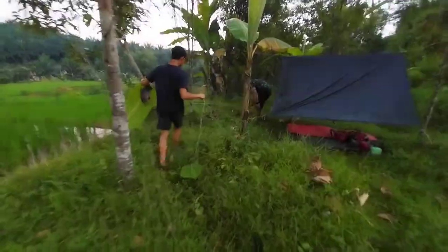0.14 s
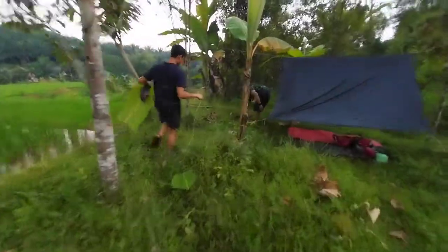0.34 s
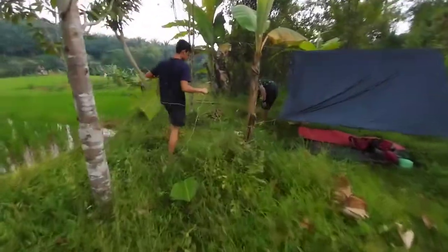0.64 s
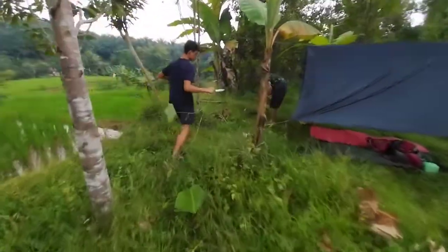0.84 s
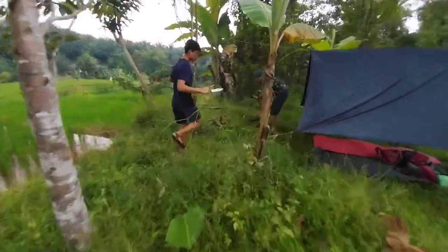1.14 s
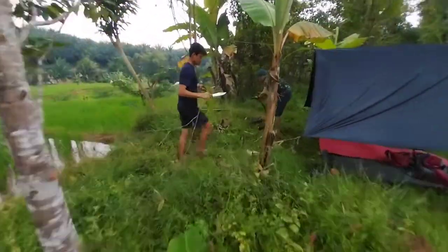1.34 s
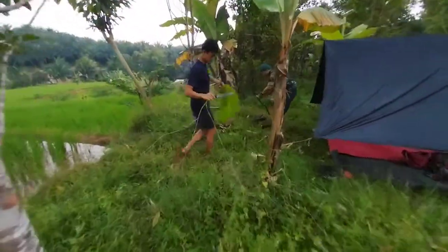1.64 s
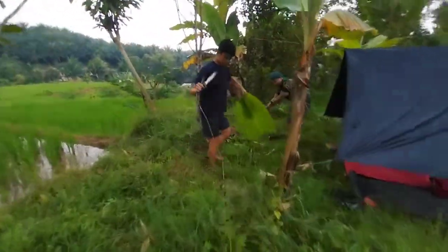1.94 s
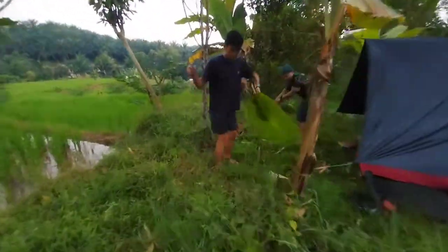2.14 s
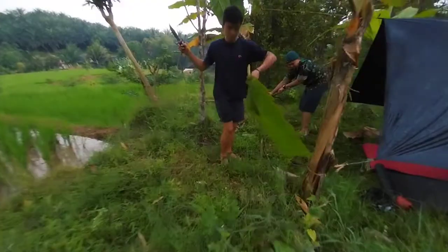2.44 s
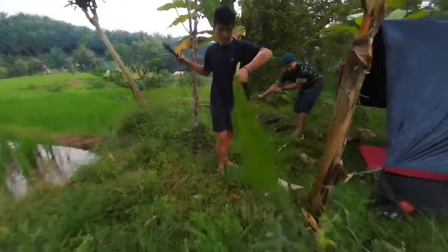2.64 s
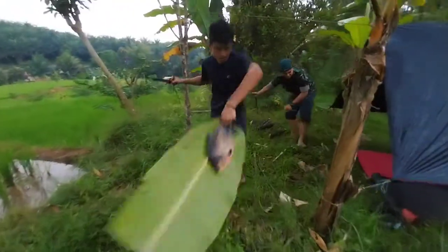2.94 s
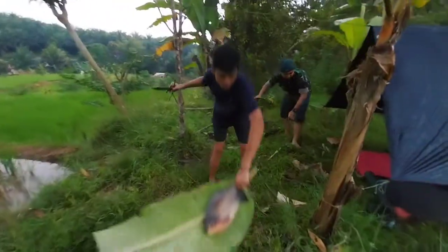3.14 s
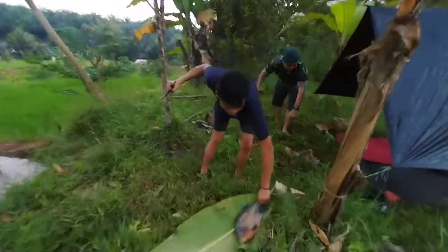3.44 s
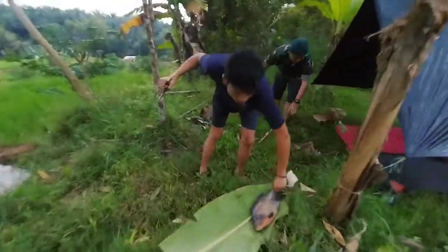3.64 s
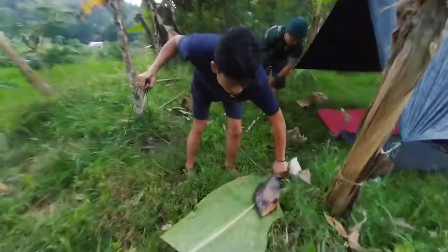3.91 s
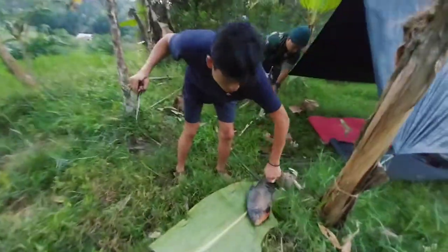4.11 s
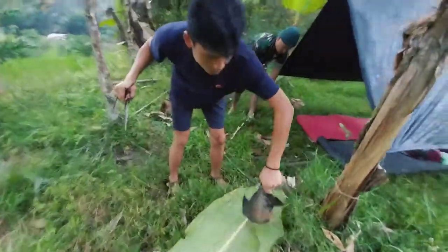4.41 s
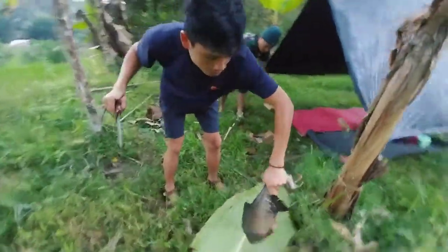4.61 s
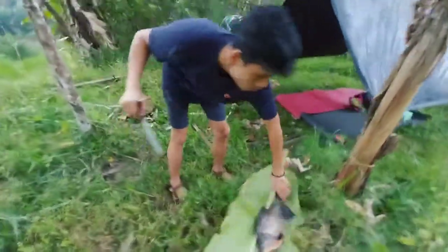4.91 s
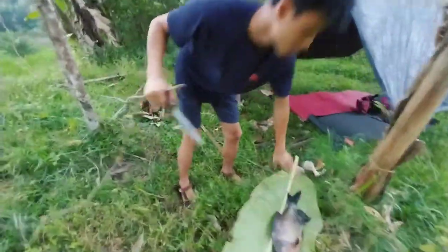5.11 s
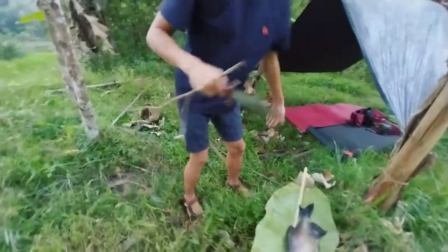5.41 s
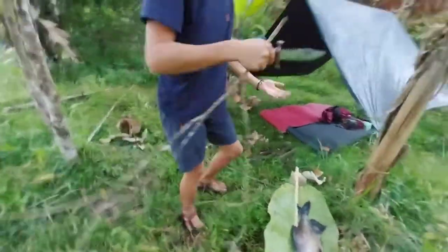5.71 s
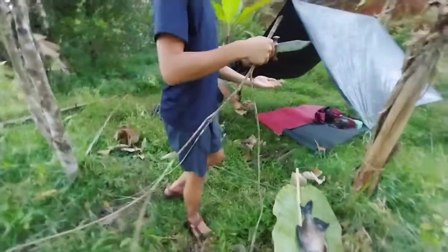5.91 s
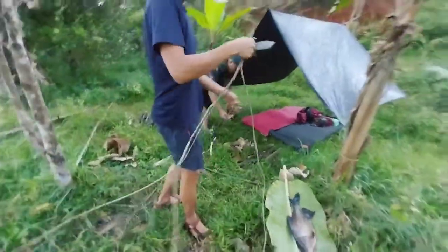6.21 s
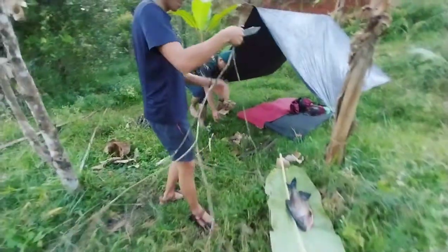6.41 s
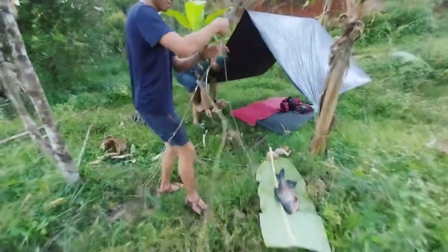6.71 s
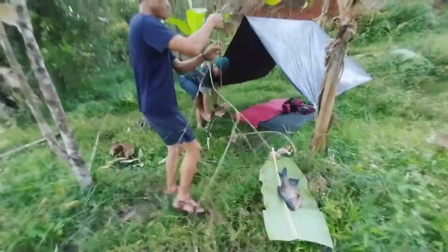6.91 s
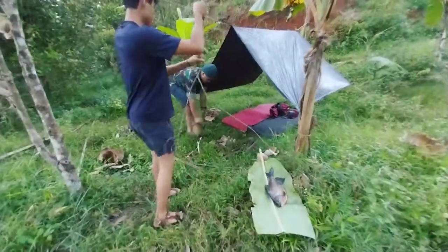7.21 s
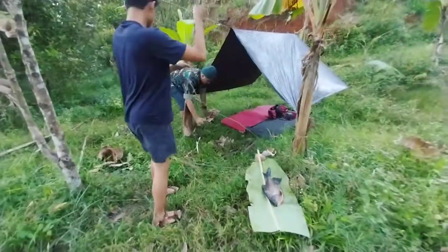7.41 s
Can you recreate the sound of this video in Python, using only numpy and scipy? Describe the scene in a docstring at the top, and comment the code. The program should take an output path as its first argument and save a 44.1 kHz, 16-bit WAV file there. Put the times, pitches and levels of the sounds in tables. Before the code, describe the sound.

From the start, footsteps swish and crunch through long grass outdoors, close by and in stereo. Beneath them lie a low rumble, a faint wavering hum, occasional soft booms and faint far insects. Small twigs crack near 0.4 seconds and dull knocks come at about 1 second. Dry sticks snap sharply at 2.1 and 2.7 seconds, the second the loudest, with a faint distant bird call between them. At about 3.4 seconds a big leaf is laid on the ground with a dull knock and slides over the grass with a hollow, grainy scrape for half a second. After a brief lull, a stick cracks at 4.8 seconds and the leaf moves again with a few soft knocks. The steps go on, with a snap near 5.8 seconds and another far bird call at 6.5. Around 7.3 seconds more sticks snap and tear.

```python
"""Walking through long grass at a field camp, heard by two closely spaced microphones.
From the start, blades swish past the legs over a low rumble, a faint hum, soft booms and far insects.
Between 2 and 3 seconds a far bird calls and dry sticks snap, the loudest sounds of the walk.
Then a big leaf is laid on the ground with a dull knock and slid over the grass; near 5 seconds it moves
again. The steps go on, a bird calls once more, and more sticks snap and tear at the end."""
import sys
import numpy as np
from scipy import signal
from scipy.fft import rfft, irfft
from scipy.io import wavfile

SR = 44100
rng = np.random.default_rng(int(sys.argv[2]) if len(sys.argv) > 2 else 0)


def int16_out(signal):
    """Quantize to a 16-bit WAV file."""
    q = np.round(np.clip(np.atleast_2d(signal).T, -1, 1) * 32767)
    wavfile.write(sys.argv[1], SR, q.astype(np.int16))


N = 333032
TIME = np.arange(N) / SR
# the tone of cracks scattered among the plants: (frequency [Hz], level [dB])
SCATTER_TONE = [(400, -2), (2400, -0.5), (5000, 0), (7500, -1.5), (9000, -7), (12000, 1)]


def from_db(db):
    """Turn decibels into a number to multiply a sound by."""
    return 10 ** (np.asarray(db) / 20)


def rms_one(x):
    """Scale a sound so that its average power is 1."""
    return x / np.sqrt(np.mean(x ** 2) + 1e-20)


def butter(x, hz, kind, order=2):
    """Keep the "low" or the "high" side of hz; a higher order cuts more steeply."""
    return signal.sosfilt(signal.butter(order, np.clip(hz, 10, .49 * SR), kind, fs=SR, output="sos"), x)


def resonate(x, hz, width_hz):
    """Let a sound ring at one pitch; a narrower width rings longer."""
    r = np.exp(-np.pi * width_hz / SR)
    feedback = [1, -2 * r * np.cos(2 * np.pi * hz / SR), r * r]
    return signal.lfilter(np.array([1, 0, -1]) * (1 - r * r) / 2, feedback, x)


def colour(x, tone):
    """Give a stereo sound the tone in a table of (frequency [Hz], level [dB])."""
    size = 4096
    hz, db = np.transpose(tone)
    shape_db = np.interp(np.log(np.arange(size // 2 + 1) * SR / size + 1), np.log(hz), db)
    # fold the filter's early half onto its late half, so nothing sounds early
    cepstrum = irfft(np.log(from_db(shape_db)))
    cepstrum[1:size // 2] *= 2
    cepstrum[size // 2 + 1:] = 0
    response = irfft(np.exp(rfft(cepstrum)))
    return signal.fftconvolve(x, response[None], axes=1)[:, :x.shape[1]]


def wander(size, hz):
    """A smooth random curve of typical size 1; a higher hz makes it move faster."""
    return rms_one(butter(rng.standard_normal(size + SR), hz, "low")[SR:])


def bump(s, half_s):
    """A smooth rise and fall around time s."""
    return np.exp(-((TIME - s) / half_s) ** 2)


def swell(s, hold_s, rise_db_per_s, fall_db_per_s, sag_db_per_s=0):
    """A strength that rises to 1 at time s, holds or sags for a while and dies away."""
    t = TIME - s
    rise = rise_db_per_s * np.minimum(t, 0)
    sag = sag_db_per_s * np.clip(t, 0, hold_s)
    fall = fall_db_per_s * np.maximum(t - hold_s, 0)
    return from_db(np.maximum(rise - sag - fall, -120))


def from_side(x, side, lag_s=0.00027):
    """A sound from one side (-1 right, 1 left) reaches the nearer microphone first."""
    lag = int(round(np.clip(side, -1.5, 1.5) * lag_s * SR))
    return np.array([np.pad(x, (max(delay, 0), 0))[:len(x)] for delay in (-lag, lag)])


def grains(size, per_s, spread_db):
    """Tiny random clicks of uneven strength."""
    strength = from_db(spread_db * np.minimum(rng.exponential(1, size), 4)) * rng.standard_normal(size)
    return strength * (rng.random(size) < per_s / SR)


def all_around(size, per_s, spread_db, count=13, width=1):
    """Tiny clicks from many directions: alike in both microphones only in the bass."""
    sides = width * (np.linspace(-1, 1, count) + rng.uniform(-1, 1, count) / count)
    return sum(from_side(grains(size, per_s / count, spread_db), side) for side in sides)


def add(out, s, sound):
    """Mix a stereo sound in at time s."""
    at = int(s * SR)
    out[:, at:at + sound.shape[1]] += sound[:, :N - at]


def rumble(buffet_hz=60, lumps_db=1.5, calming_db_per_s=1.5):
    """Low outdoor rumble; air pushes on each microphone separately and slowly calms."""
    # the rumble's tone: (frequency [Hz], level [dB])
    tone = [(25, -23.5), (60, -7), (100, -0.5), (140, -6), (210, -5.5), (290, -15.5), (900, -41)]
    # its rise and fall: (time [s], level [dB])
    levels = [(0, -48), (1.1, -47), (1.5, -54), (1.9, -45), (3.1, -51.5), (3.9, -45), (7.55, -47.5)]
    shared = rms_one(colour(all_around(N, per_s=20000, spread_db=1.5, count=5), tone))
    buffet = rms_one(butter(colour(rng.standard_normal((2, N)), tone), buffet_hz, "low"))
    s, db = np.transpose(levels)
    level = from_db(np.interp(TIME, s, db, right=-120) + lumps_db * wander(N, 11.6))
    return level * (shared + from_db(-calming_db_per_s * TIME) * buffet)


def hum(level_db=-6.5, wobble_hz=2.83, flicker_db=-1.0):
    """A faint low tone that wavers in pitch and strength."""
    # the hum's drift: (time [s], pitch [Hz], level before level_db is added [dB])
    drift = [(0, 208, -53.5), (3, 209.7, -59), (4.551, 192.8, -45.5), (5.3, 181.1, -42.5),
             (5.65, 206.7, -48.5), (7.55, 168, -46.5)]
    s, hz, db = np.transpose(drift)
    pitch = np.interp(TIME, s, hz) + wobble_hz * wander(N, 12.73)
    level = from_db(np.interp(TIME, s, db) + level_db + flicker_db * wander(N, 9.2))
    return level * rms_one(np.sin(2 * np.pi * np.cumsum(pitch) / SR))


def insects(chirp_s=0.045, top_hz=5060, fall_hz=750, blur_hz=200, whine_hz=6930, whine_db=-65):
    """Far insects: trills of quick falling chirps, blurred by distance, and a thin pulsing whine."""
    # each trill: (time [s], level [dB])
    trills = [(1.37, -66), (4.27, -63), (4.72, -65), (5.231, -56.5)]
    # each spell of whining: (time [s], half length [s])
    whines = [(.53, 0.15), (1.333, 0.11), (2.95, 0.9)]
    in_chirp = TIME / chirp_s % 1  # runs from 0 to 1 in every chirp
    pitch = top_hz - fall_hz * in_chirp + blur_hz * np.array([wander(N, 377) for _ in range(2)])
    chirps = rms_one(np.sin(np.pi * in_chirp) * np.sin(2 * np.pi * np.cumsum(pitch, axis=1) / SR))
    pulses = np.sin(np.pi * 16 * TIME) ** 2  # 16 a second
    whine = rms_one(resonate(rng.standard_normal((2, N)), whine_hz, width_hz=130) * pulses)
    trill_level = sum(from_db(db) * bump(s, half_s=0.095) for s, db in trills)
    whine_level = from_db(whine_db) * sum(bump(s, half_s) for s, half_s in whines)
    return trill_level * chirps + whine_level * whine


def birds(rise_hz_per_s=4200, blur_hz=190):
    """Short rising calls from across the field, smeared by distance."""
    # each call: (time [s], level [dB], pitch [Hz], half length [s])
    calls = [(2.343, -60.5, 3270, .06), (6.484, -57, 1734, .055)]
    out = 0
    for s, db, hz, half_s in calls:
        glide = rise_hz_per_s * np.clip(TIME - s, -2 * half_s, 2 * half_s)
        pitch = hz + glide + blur_hz * wander(N, 2 * blur_hz)
        out += from_db(db) * bump(s, half_s) * np.sqrt(2) * np.sin(2 * np.pi * np.cumsum(pitch) / SR)
    return out


def booms(waver=0.34, sag_hz_per_s=70):
    """Short, soft swells in the bass whose pitch wavers and sinks a little."""
    # each boom: (time [s], level [dB], pitch [Hz], half length [s])
    swells = [(0.761, -36.5, 106, 0.018), (1.062, -34, 95, 0.012), (2.504, -40.5, 97, 0.034),
              (3.358, -23, 188, 0.0074), (4.528, -37.5, 101, 0.056), (5.247, -33, 103.5, 0.035),
              (5.724, -38, 106.3, 0.033), (5.99, -38.5, 137.4, 0.035), (6.499, -40, 136.5, 0.037)]
    out = np.zeros(N)
    for s, db, hz, half_s in swells:
        near = np.abs(TIME - s) < 4 * half_s
        t = TIME[near] - s
        phase = 2 * np.pi * (hz * t - sag_hz_per_s * t ** 2 / 2 + rng.random())
        phase += waver * wander(len(t), 51)
        out[near] += from_db(db) * np.sqrt(2) * np.sin(phase) * np.exp(-(t / half_s) ** 2 / 2)
    return out


def wading(press, slide):
    """How strongly the grass swishes and crunches as the legs and the leaf push through it."""
    # each sweep of a leg: (time at full speed [s], length [s], blade swish [dB], stalk crunch [dB])
    strides = [(.03, 0.054, -44.5, -57), (.2, 0.11, -45.5, -52.5), (.345, 0.013, -61, -51),
               (.73, 0.1, -47.5, -56), (0.979, 0.053, -37, -45.5), (1.53, 0.01, -48.5, -59.5),
               (1.676, 0.16, -44.5, -50.5), (2.0, 0.19, -52.5, -62.5), (2.45, 0.092, -41.5, -49),
               (3.15, 0.081, -50, -63), (3.93, 0.1, -50.5, -48.5), (4.44, 0.16, -42.5, -49),
               (5.28, 0.019, -82, -49.5), (5.462, 0.16, -37.5, -56), (5.74, 0.11, -40.5, -50),
               (6.01, 0.095, -47, -53.5), (6.199, 0.053, -39, -44.5), (6.47, 0.012, -75, -50),
               (6.89, 0.17, -52.5, -54)]
    # powers add up, starting with a faint steady stir and the grass under the leaf
    swish = from_db(-56) ** 2 + (from_db(-4) * slide) ** 2 + (from_db(-10) * press) ** 2
    crunch = from_db(-65.5) ** 2 + (from_db(-1.5) * slide) ** 2
    for s, length_s, swish_db, crunch_db in strides:
        # the leg speeds up, then the grass springs back
        sweep = swell(s, length_s, rise_db_per_s=169, fall_db_per_s=128)
        swish += (from_db(swish_db) * sweep) ** 2
        crunch += (from_db(crunch_db) * sweep) ** 2
    hush = from_db(-9 * bump(s=4.73, half_s=0.11))  # for a moment nobody moves
    return hush * np.sqrt(swish), hush * np.sqrt(crunch)


def tufts(x, patchy_db=4.5, patchy_hz=9, count=12):
    """Each tuft of grass has its own tone: ringing in the middle pitches comes and goes."""
    rings = sum((from_db(patchy_db * wander(N, patchy_hz)) - 1) * resonate(x, hz, hz / count * 2)
                for hz in np.geomspace(900, 7000, count))
    return rms_one(x + rings / 2)


def grass(swish, crunch, blades_db=2.5, stalks_db=-1.5, stems_db=-8, flutter_db=0.6, clumps_db=2.0):
    """Blades brush by in a fine hiss, stalks give way in coarser clicks, and single stems crack."""
    # the bright tone of brushing blades: (frequency [Hz], level [dB])
    blade_tone = [(1200, -10), (2600, -2), (4600, 0), (7500, -0.5), (8700, -3), (12000, 3.5), (15500, 0)]
    # the darker tone of crunching stalks: (frequency [Hz], level [dB])
    stalk_tone = [(250, -22.5), (600, 3.5), (900, -2), (1500, 2.5), (2100, 1), (3200, -3.5), (6000, -22)]
    flutter = from_db(flutter_db * wander(N, 35))
    blades = tufts(colour(all_around(N, per_s=53000, spread_db=1.5, count=23), blade_tone))
    stalks = tufts(colour(all_around(N, per_s=5000, spread_db=0.5, width=0.78), stalk_tone))
    stems = rms_one(colour(all_around(N, per_s=130, spread_db=3.5, count=5), SCATTER_TONE))
    clumps = from_db(stalks_db + clumps_db * wander(N, 50))
    brushing = from_db(blades_db) * blades + from_db(stems_db) * stems
    return flutter * (swish * brushing + clumps * crunch * stalks)


def leaf_motion(slide_db=-7):
    """How strongly the big leaf is pressed down, and how strongly it slides on."""
    # each move of the leaf: (time [s], level of the press [dB], pressing time [s], sliding time [s])
    moves = [(3.362, -27, 0.058, 0.53), (5.02, -32.5, 0.06, 0.059)]
    press = slide = 0
    for s, db, press_s, slide_s in moves:
        press += from_db(db) * swell(s, press_s, rise_db_per_s=281, fall_db_per_s=258)
        glide = swell(s, slide_s, rise_db_per_s=224, fall_db_per_s=87, sag_db_per_s=9.5)
        slide += from_db(db + slide_db) * glide
    return press, slide


def leaf(press, slide):
    """The broad leaf catches and slips on the grass with a hollow, grainy scrape."""
    # the scrape's tone: (frequency [Hz], level [dB])
    tone = [(80, -27), (190, 5.5), (340, -4.5), (540, 1.5), (850, -5), (2500, -15), (5000, -15.5),
            (10000, -58)]
    scrape = rms_one(colour(all_around(N, per_s=4600, spread_db=1.0, width=0.41), tone))
    return np.hypot(press, slide) * scrape


def knocks(crush_db=-0.5, low_hz=150, give=0.015):
    """Dull knocks on the ground: leaf and turf ring briefly while the grass beneath is crushed."""
    # each knock: (time [s], level [dB], time to fade by 60 dB [s], treble cut [Hz])
    hits = [(0.996, -34, 0.07, 2060), (1.024, -28.5, 0.058, 1380), (1.056, -49.5, 0.26, 900),
            (1.176, -52.5, 0.12, 596), (2.697, -46.5, 0.028, 1200), (3.295, -39, 0.074, 593),
            (3.349, -24.5, 0.053, 600), (3.3655, -17, 0.081, 720), (3.422, -27, 0.046, 1620),
            (4.825, -39, 0.045, 1410), (4.937, -24.5, 0.026, 610), (5.028, -32.5, 0.056, 865),
            (5.048, -28, 0.064, 775), (5.08, -26, 0.041, 1100), (7.351, -44.5, 0.057, 1420)]
    # the notes that leaf and turf ring with: (pitch [Hz], level [dB], longest time to fade by 60 dB [s])
    notes = [(202.4, -12, 0.23), (353, -2, 0.021), (528.5, 1, 0.039), (635, -8, 0.18), (1250, -3, 0.031)]
    out, t = np.zeros((2, N)), TIME[:SR // 4]
    for s, db, fade_s, top_hz in hits:
        sink = 1 - np.exp(-t / (give * fade_s))  # longer knocks press in more gradually
        fall = sink * from_db(-60 * t / fade_s)
        crush = butter(all_around(len(t), per_s=22000, spread_db=-4.5, width=0.76) * fall, low_hz, "high")
        ring = 0
        for hz, note_db, ring_s in notes:
            level = from_db(note_db + rng.normal(0, 0.27) - 60 * t / min(ring_s, 2 * fade_s))
            ring += level * np.sin(2 * np.pi * hz * (1 + rng.normal(0, 0.027)) * t)
        knock = from_db(crush_db) * rms_one(butter(crush, top_hz, "low", order=5))
        knock += rms_one(butter(sink * ring, top_hz, "low"))
        add(out, s, from_db(db) * knock * np.sqrt(2 * np.mean(fall ** 2)))
    return out


def foliage_echo(size):
    """Ground, leaves and trunks scatter a crack into a short, smooth tail."""
    t, power = TIME[:size], 0
    for db, fade_s in ((1.5, 0.024), (0.0, 0.19), (-14.5, 1.0)):  # from nearby, farther off, the woods
        fall = from_db(-60 * t / fade_s) * (1 - np.exp(-t / 0.0048))
        power += (from_db(db) * fall) ** 2 / np.sum(fall ** 2)
    return rms_one(colour(all_around(size, per_s=46000, spread_db=5.0), SCATTER_TONE)) * np.sqrt(power)


def snaps(close_db=-5.0, stereo_noise=0.47, first_db=3.0, first_s=0.0018, clean_s=0.0081, body_db=-16):
    """A dry stick breaks: one sharp crack, then a fading burst of tearing fibres that rings the wood."""
    # each break: (time [s], level [dB], tearing time [s], bass cut [Hz], treble cut [Hz],
    # side [-1 right to 1 left])
    breaks = [(.369, -26, 0.025, 900, 1900, 0.32), (0.384, -25, 0.006, 1000, 2200, .17),
              (2.0709, -13, 0.0096, 2010, 17000, 0.52), (2.5765, -20.5, 0.0066, 1200, 3600, 0.27),
              (2.6, -32, .008, 3500, 12000, 0), (2.669, -26.5, 0.0045, 1200, 4500, 0),
              (2.696, -3.5, 0.0059, 1470, 13000, -0.38), (3.423, -34, .015, 800, 8000, 0),
              (3.832, -29, 0.025, 700, 9000, -0.66), (4.8238, -13, 0.053, 2330, 12900, -0.091),
              (4.839, -25, 0.03, 700, 7000, 0), (5.6, -28, 0.01, 696, 7000, 0),
              (5.757, -19, 0.0075, 564, 7960, 0.26), (6.041, -35, 0.0069, 810, 7000, 0.24),
              (6.56, -42.5, 0.01, 2200, 15000, 0), (7.076, -35, .012, 3000, 15000, 0.27),
              (7.2543, -18, 0.068, 840, 15000, 0.24), (7.264, -18, 0.064, 1900, 18000, 0.26),
              (7.318, -25.5, 0.046, 650, 4600, .3), (7.351, -21.5, 0.013, 597, 2800, 0.33)]
    # the notes that the wood rings with: (pitch [Hz], width [Hz], level [dB])
    notes = [(1520, 290, 6.5), (2250, 330, 5), (4600, 1200, 5.5), (9500, 4000, -8)]
    out, t = np.zeros((2, N)), TIME[:SR // 2]
    for s, db, tear_s, low_hz, top_hz, side in breaks:
        fall = from_db(-60 * t / tear_s)
        fibres = rms_one(from_side(grains(len(t), per_s=75000, spread_db=-7.0), side))
        sudden = from_db(first_db) * (clean_s / tear_s) ** 2  # a clean break spends more energy at once
        fracture = sudden * np.exp(-(2 * t / first_s - 1) ** 2)
        burst = (fall + fracture) * (fibres + stereo_noise * rng.standard_normal(fibres.shape)) + 1e-18
        tuning = np.exp(0.035 * rng.standard_normal())  # every stick rings at its own pitch
        wood = burst + sum(from_db(note_db) * resonate(burst, hz * tuning, width_hz)
                           for hz, width_hz, note_db in notes)
        # a little bass comes from the stick as a whole
        wood = butter(wood, low_hz, "high", order=3) + from_db(body_db) * wood
        echo_share = 1 / np.hypot(1, from_db(db - close_db))  # the loudest sticks are closest: less echo
        echo = echo_share * butter(foliage_echo(len(t)), low_hz, "high")
        crack = rms_one(wood) / np.sqrt(len(t)) + echo
        crack = butter(crack, top_hz, "low")  # thick sticks sound lower and duller
        add(out, s, from_db(db) * np.sqrt(np.sum(fall ** 2)) * crack)
    return out


def scene():
    """Everything together; sticks and ground sounds are a little louder on the right."""
    sticks = snaps() * from_db([[-1.0], [1.0]])
    press, slide = leaf_motion()
    swish, crunch = wading(press, slide)
    ground = grass(swish, crunch) + leaf(press, slide) + knocks() + booms() + hum() + rumble()
    return sticks + ground * from_db([[-0.75], [0.75]]) + insects() + birds()


def record(dry):
    """The deepest bass is lost, the highest peaks are rounded and the treble is cut above 15550 Hz."""
    rounded = 1.2 * np.tanh(butter(dry, 30, "high") / 1.2)
    return signal.sosfilt(signal.ellip(10, .2, 80, 15550, fs=SR, output="sos"), rounded)


dry = scene()
out = record(dry)
int16_out(out)
```